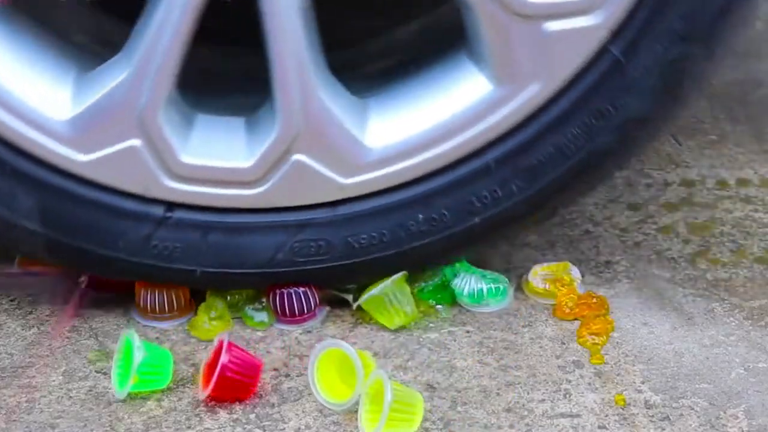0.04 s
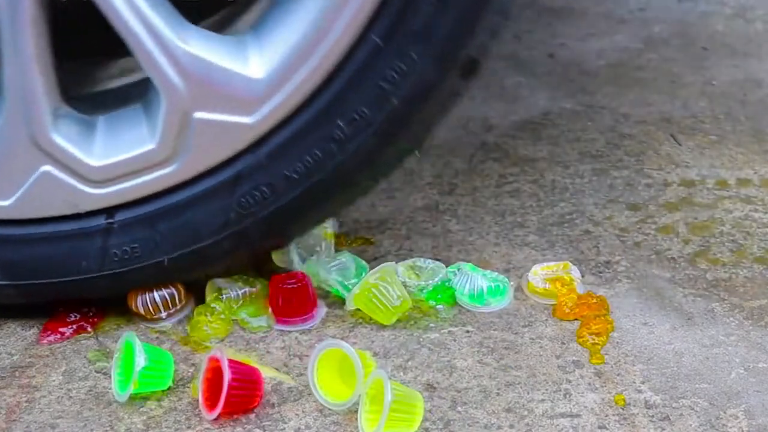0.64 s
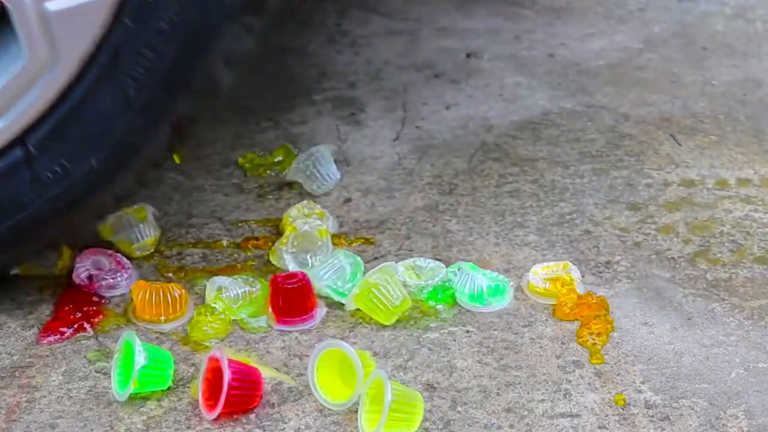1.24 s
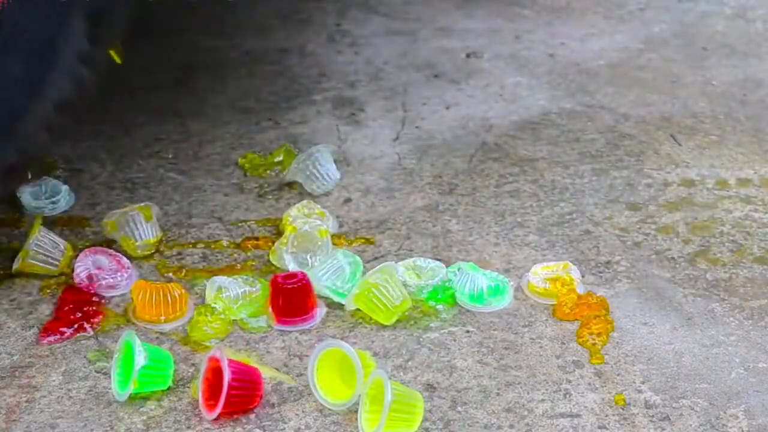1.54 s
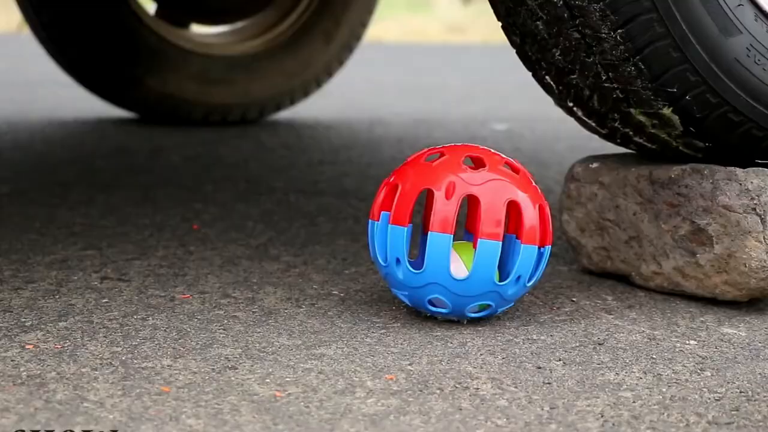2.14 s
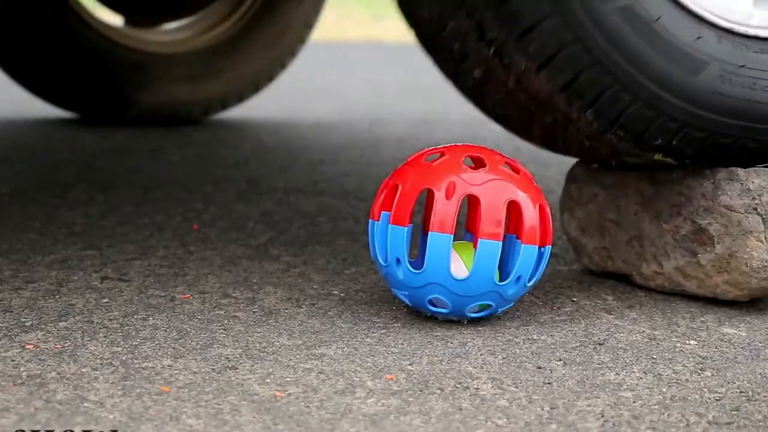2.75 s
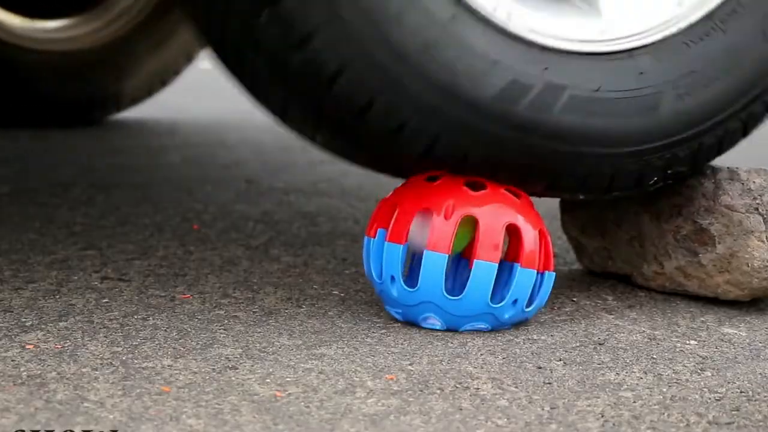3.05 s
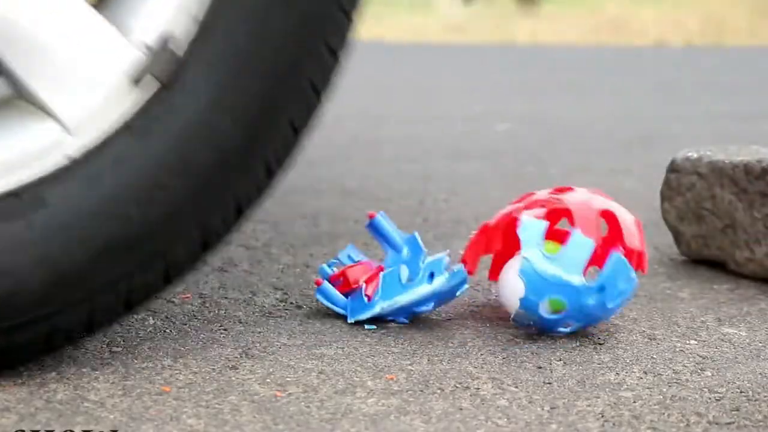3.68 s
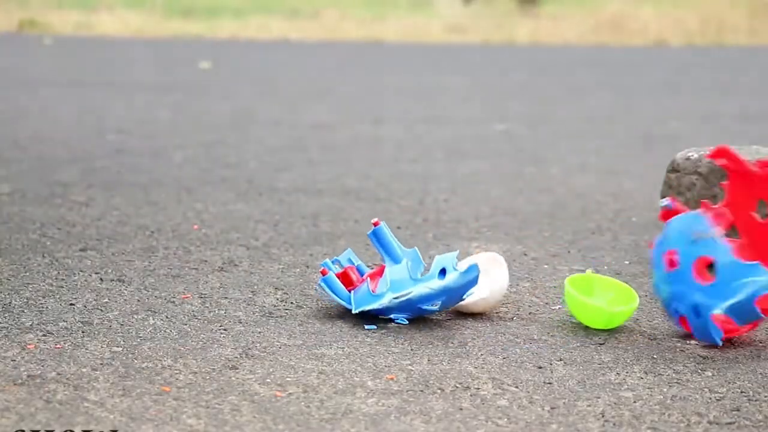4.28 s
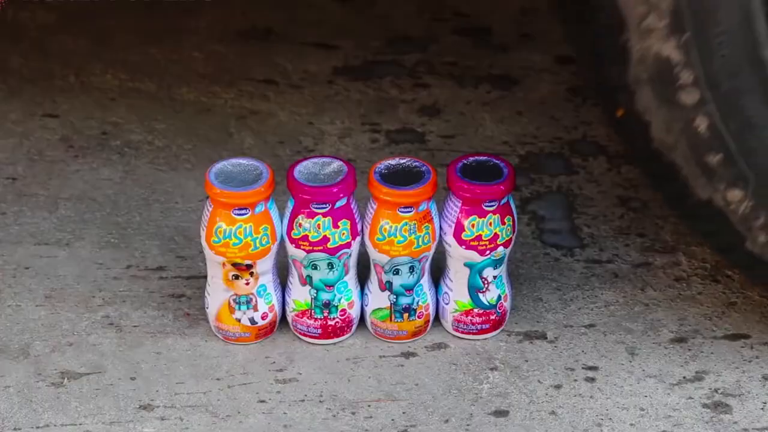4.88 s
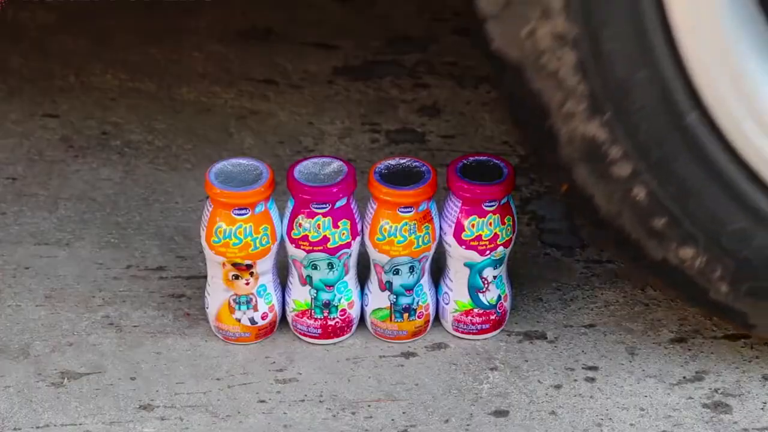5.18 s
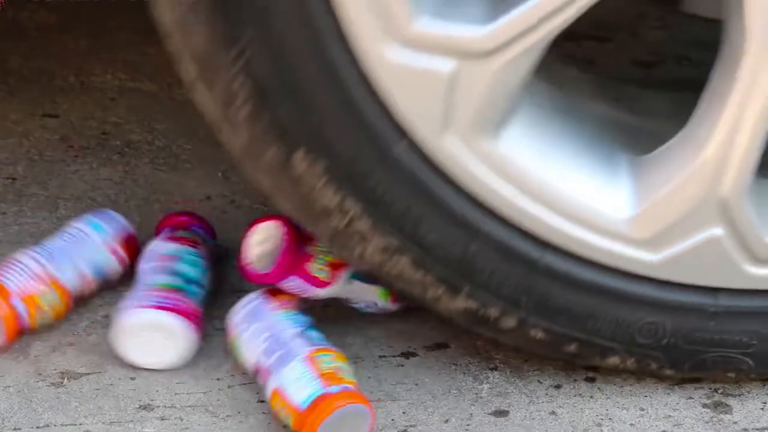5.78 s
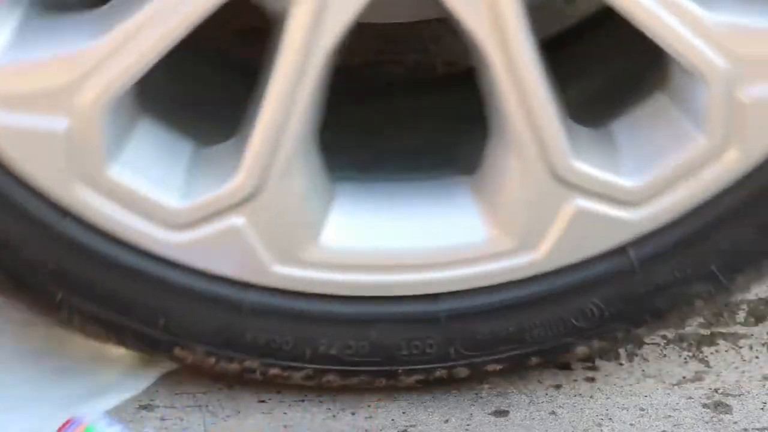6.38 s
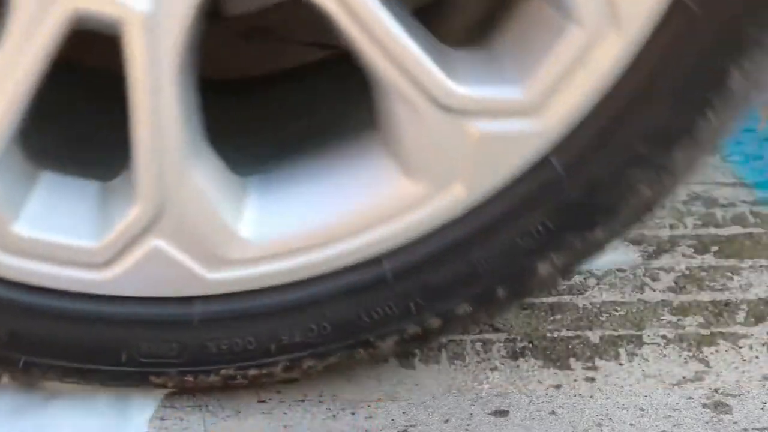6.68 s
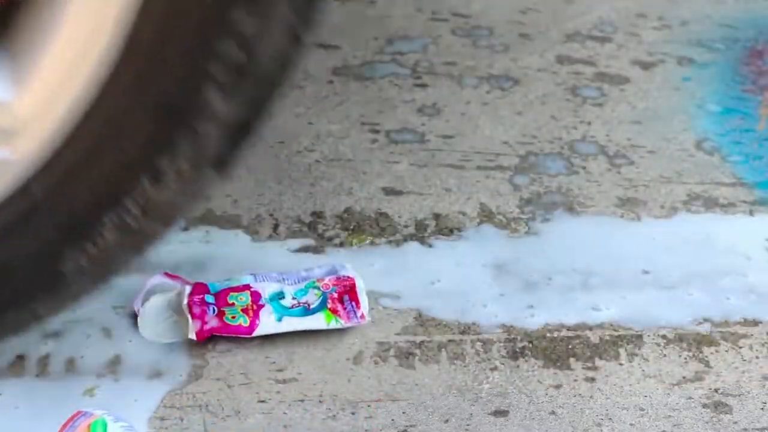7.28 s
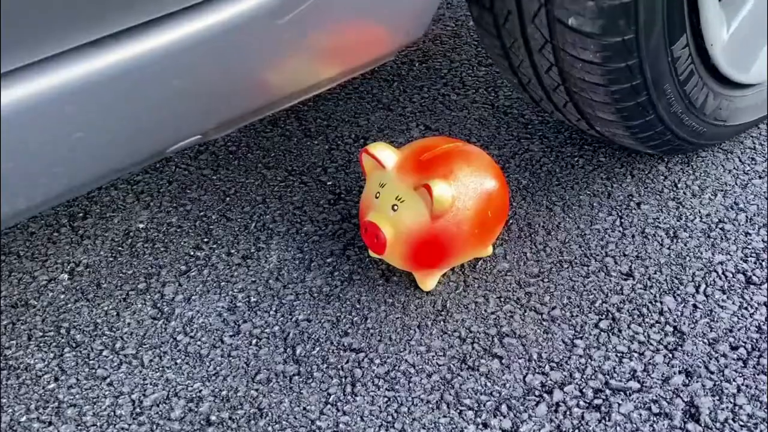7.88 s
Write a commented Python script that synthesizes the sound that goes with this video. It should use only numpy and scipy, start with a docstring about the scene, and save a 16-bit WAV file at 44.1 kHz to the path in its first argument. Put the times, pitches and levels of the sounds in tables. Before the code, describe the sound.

A car tyre crushes jelly cups close to the microphone, with crackling plastic, sharp pops and wet squirts in the first half second. Smaller snaps and light taps of falling cups follow until about 1.3 seconds, over a quiet idling engine. From 2.1 seconds the sound is further off and in stereo: a second car revs gently, its rubber scuffing on stone. From 3.1 to 3.5 a hollow plastic ball shatters in several loud cracks with low thumps, and pieces tick and scrape away over the paving until 4.7. At 4.8 the close mono idle returns, louder. Around 5.7 small drink bottles topple with hollow knocks and burst in loud pops, the strongest near 6.2. Dense crackling and snapping continue, with liquid spurting and sputtering from 6.6 to 7.2. A few last crackles follow, and at 7.8 a gust briefly rumbles on the microphone.

```python
"""A paved yard, where a car tyre rolls slowly over things in three scenes, the engine idling behind it.
Close to the microphone, in mono, jelly cups buckle, pop their lids and squirt. Further off, in stereo,
a second car climbs a stone and shatters a hollow plastic ball, whose pieces rattle away. Close again,
small drink bottles topple, burst, crackle under the tread and spit out their contents.
A gust catches the microphone at the very end."""
import sys
import numpy as np
from scipy import signal
from scipy.fft import rfft, irfft, next_fast_len
from scipy.io import wavfile

SR = 44100
rng = np.random.default_rng(int(sys.argv[2]) if len(sys.argv) > 2 else 0)


def materialize(psi):
    """Save the field psi as 16-bit PCM at rate SR to the path in sys.argv[1].

    A 1-D psi becomes a single channel; in a 2-D psi each row is a channel.
    """
    bounded = np.clip(np.atleast_2d(psi).T, -1, 1)
    quanta = np.round(bounded * 32767).astype(np.int16)
    wavfile.write(sys.argv[1], SR, quanta)


N = 349707
T = np.arange(N) / SR
FFT_SIZE = next_fast_len(N)
BIN_HZ = np.arange(FFT_SIZE // 2 + 1) * SR / FFT_SIZE


def from_db(db):
    """Decibels to gain."""
    return 10 ** (np.asarray(db) / 20)


def rms_one(x):
    """Scale to unit power."""
    return x / np.sqrt(np.mean(x ** 2) + 1e-20)


def bin_gains(spectrum):
    """Gain at each FFT bin, from points (freq_hz, level_db) joined on a log-frequency axis."""
    hz, db = np.transpose(spectrum)
    return from_db(np.interp(np.log(BIN_HZ + 1), np.log(hz), db))


def colour(x, spectrum):
    """Give a steady texture a spectrum that falls away beyond its ends; rms 1."""
    below = np.minimum(BIN_HZ / spectrum[0][0], 1) ** 3
    above = np.minimum(spectrum[-1][0] / (BIN_HZ + 1), 1) ** 3
    return rms_one(irfft(rfft(x, FFT_SIZE) * bin_gains(spectrum) * below * above, FFT_SIZE)[:N])


def noise(spectrum):
    """Coloured noise, rms 1."""
    return colour(rng.standard_normal(N), spectrum)


def band(x, low_hz, high_hz, order=2):
    """Causal band-pass."""
    high_hz = min(high_hz, .45 * SR)
    low_hz = min(low_hz, .9 * high_hz)
    return signal.sosfilt(signal.butter(order, [low_hz, high_hz], "band", fs=SR, output="sos"), x)


def band_noise(low_hz, high_hz, size):
    """Noise between two edges, rms 1."""
    return rms_one(band(rng.standard_normal(size), low_hz, high_hz))


def friction(hz, width_hz, size=N):
    """Friction noise through one resonance, rms 1."""
    return band_noise(hz - width_hz / 2, hz + width_hz / 2, size)


def waver(per_s):
    """Slow random wander, spread about 1."""
    return np.interp(T * per_s, np.arange(1000), rng.standard_normal(1000))


def tones(lines, wander):
    """Engine lines (pitch_hz, rms_db), each wandering a little in phase."""
    return sum(np.sqrt(2) * from_db(db) * np.sin(2 * np.pi * (hz * T + rng.random()) + wander * waver(8.6))
               for hz, db in lines)


def grains(per_s, spread_db, size=N):
    """Random clicks of either sign, most small and a few large."""
    heights = from_db(spread_db * np.minimum(rng.exponential(1, size), 4)) * rng.choice([-1, 1], size)
    return heights * (rng.random(size) < per_s / SR)


def decay(t, t60_s):
    """A fall of 60 dB every t60_s."""
    return from_db(-60 * t / t60_s)


def burst(t, length_s, rise_s, t60_s):
    """Rise, hold, then a dying tail."""
    return np.clip(t / rise_s, 0, 1) * decay(np.maximum(t - length_s, 0), t60_s)


def add(track, start_s, sound):
    """Mix a sound in at a time."""
    i = max(round(start_s * SR), 0)
    track[i:i + len(sound)] += sound[:max(N - i, 0)]


def ring(clicks, hz, t60_s):
    """A unit click sets a sine of height 1 ringing."""
    r, w = decay(1 / SR, t60_s), 2 * np.pi * hz / SR
    return signal.lfilter([0, np.sin(w)], [1, -2 * r * np.cos(w), r * r], clicks + 1e-18)


def struck(blows, modes):
    """Blows (start_s, level_db) on a body with modes (pitch_hz, level_db, t60_s)."""
    clicks = np.zeros(N)
    for start_s, db in blows:
        add(clicks, start_s, from_db([db]))
    return sum(from_db(db) * ring(clicks, hz, t60_s) for hz, db, t60_s in modes)


def knocked(blows, modes):
    """Blows (start_s, level_db, pitch_ratio) on like bodies of slightly different sizes."""
    return sum(struck([(start_s, blow_db)], [(hz * ratio, db, t60_s) for hz, db, t60_s in modes])
               for start_s, blow_db, ratio in blows)


def scatter(x, t60_s, low_hz, high_hz):
    """A diffuse dying tail: many close reflections or modes."""
    t = T[:int(t60_s * SR) + 2]
    tail = band(rng.standard_normal(len(t)), low_hz, high_hz, order=1) * burst(t, 0, .0036, t60_s)
    return signal.oaconvolve(x, tail / np.linalg.norm(tail))[:len(x)]


# Stereo width at the microphone: freq_hz, side_gain_db
WIDTH = [(60, -7), (110, -6), (200, -12), (380, -8.5), (700, -5), (1290, -5.5), (2380, -2.5), (4400, -4.5),
         (8120, 1), (15000, -1.5)]
def stereo(source):
    """Two draws of a source as mid and side; the microphone's two ports differ most in the treble."""
    mid, side = source(), source()
    side = irfft(rfft(side, FFT_SIZE) * bin_gains(WIDTH), FFT_SIZE)[:N]
    return np.array([mid + side, mid - side])


# Hum of the near engine: pitch_hz, relative_db
ENGINE_HUM = [(80.7, -38.5), (102.3, -46.5), (118.4, -41.5), (199.2, -58), (220.7, -50), (419.9, -55.5),
              (581.4, -55)]
# Its fan and belt whirr: freq_hz, density_db
FAN_WHIRR = [(76, -34.5), (130, -8), (224, -1.5), (268, -11.5), (410, -7.5), (994, -14), (1340, -11.5),
             (2050, -17.5), (3830, -21), (13600, -32), (16000, -41)]
# Its belt and pulley whines: pitch_hz, width_hz, relative_db
BELT_WHINES = [(600, 35, -17.5), (1395, 79, -12.5), (3900, 250, -19.5), (5570, 170, -20)]
# Its level at the microphone, held until the next step: start_s, hum_db, whirr_db
IDLE_STEPS = [(0, -45, -48.5), (4.8, -38.5, -37.5), (6.24, -61, -56), (6.36, -45, -52.5),
              (6.929, -58, -57.5)]
def idling_car(tick_hz=19.9, tick_depth=.19, shudder_db=-12):
    """Low engine lines and shudder under a whirr that swells briefly with each valve tick."""
    start_s, hum_db, whirr_db = np.transpose(IDLE_STEPS)
    step = np.searchsorted(start_s[1:], T)
    ticks = 1 + tick_depth * np.cos(np.pi * tick_hz * T) ** 16
    hum = rms_one(tones(ENGINE_HUM, wander=.25))
    hum += from_db(shudder_db) * noise([(24, 2.5), (65, 1), (160, -8)])
    whirr = noise(FAN_WHIRR) + sum(from_db(db) * friction(hz, width) for hz, width, db in BELT_WHINES)
    return from_db(hum_db)[step] * hum + from_db(whirr_db)[step] * rms_one(whirr) * ticks


# The tread bearing down on one thing after another, close up:
# start_s, length_s, release_t60_s, crackle_db, hiss_db, rumble_db, cracks_per_s
CRUSH_LOADS = [(-.02, .27, 0.34, -44, -41, -32.5, 3200), (0.279, .19, 0.31, -44, -39.5, -33.5, 3500),
               (1.09, .16, 0.44, -55, -73, -72, 190), (5.712, 0.27, 0.22, -45, -71, -37, 500),
               (5.948, .275, .08, -36, -46, -32, 570), (6.353, .15, .16, -30.5, -41.5, -39, 600),
               (6.536, .09, .1, -35, -47, -48, 300), (6.633, .27, .1, -25, -34, -38.5, 1700),
               (6.917, .13, .1, -23.5, -35.5, -51, 3000), (7.3, .36, 0.37, -47.5, -68, -70, 320)]
# Crackle and wet hiss under the tread: freq_hz, density_db
TREAD_CRACKLE = [(290, -43.5), (500, -7.5), (538, -14.5), (761, 0.5), (855, -4), (2330, -2), (4940, -0.5),
                 (9090, -5), (12500, -3), (16000, -13)]
# Rumble of the loaded tyre: freq_hz, density_db
TYRE_RUMBLE = [(40, -6.5), (110, 2), (200, 2), (330, -4.5), (700, -7.5), (1500, -20), (3000, -44.5)]
def tread(grit_db=-62.5, grit_per_s=100, ring_cycles=12, rasp_db=-13, clump_db=4):
    """Under each crush, grit and creased plastic crackle in clumps, juice hisses, the tyre rumbles."""
    loads = np.array([burst(T - start_s, length_s, rise_s=.018, t60_s=t60_s)
                      for start_s, length_s, t60_s, *_ in CRUSH_LOADS])
    *_, crackle_db, hiss_db, rumble_db, cracks_per_s = np.transpose(CRUSH_LOADS)
    crackle_gain, hiss_gain, rumble_gain = (np.sqrt(from_db(db) ** 2 @ loads ** 2)
                                            for db in (crackle_db, hiss_db, rumble_db))
    per_s = grit_per_s + cracks_per_s @ loads
    cracks = grains(per_s, spread_db=5) / np.sqrt(per_s)
    pitches_hz = np.geomspace(900, 14500, num=18)
    pitch_index = rng.integers(0, len(pitches_hz), N)
    rings = sum(hz * ring(cracks * (pitch_index == k), hz, ring_cycles / hz)
                for k, hz in enumerate(pitches_hz))
    rasp = from_db(rasp_db) * rng.standard_normal(N)
    crackle = colour(rms_one(rings) + rasp, TREAD_CRACKLE) * from_db(clump_db * waver(90))
    crackle *= np.hypot(crackle_gain, from_db(grit_db))   # loose grit goes on between crushes
    return crackle + hiss_gain * noise(TREAD_CRACKLE) + rumble_gain * noise(TYRE_RUMBLE)


# Thin cup and bottle walls buckling, close up: start_s, peak_db, pitch_hz
BUCKLES = [(0.0638, -4, 4350), (0.0965, 6, 4940), (.176, -0.5, 3640), (0.2484, -12.5, 3000),
           (0.302, 7, 8900), (0.5966, -3.5, 6000), (0.6165, -13.5, 2350), (0.8563, -21, 3270),
           (1.9832, -18.5, 6230), (6.0488, -2.5, 9400), (6.0852, 1, 12300), (6.1126, 0.5, 4750),
           (6.1491, 7, 13700), (6.188, 2, 12200), (6.308, -0.5, 3880), (6.314, -6, 3970),
           (6.3237, -7, 5930), (6.3366, -3.5, 11800), (6.3704, -1, 8600), (6.3865, -8, 3300),
           (6.4176, 3.5, 8300), (6.4347, -3, 8500), (6.479, 5, 11500), (6.494, -3, 6000),
           (6.5018, 5.5, 7750), (6.5278, 3.5, 12600), (6.5514, -13.5, 2360), (6.5828, 1.5, 3670),
           (6.6162, 3, 5200), (6.7177, -5, 5200), (6.7723, 2, 11500), (6.8384, 6.5, 5630),
           (6.8535, -6, 3900), (6.8829, -4.5, 2800), (6.992, -2, 5070), (7.4441, -18, 5600),
           (7.546, 0, 12900), (7.729, -19, 10500)]
def snaps(ring_cycles=8, slip_size=.13, creep_db=-12, creep_s=.0012, clicky_hz=7480, lead_s=.0002):
    """A wall creeps, buckles with one sharp click and slips a few more times; its panel rings briefly."""
    out, onset = np.zeros(N), SR // 200
    t = T[:SR // 30] - onset / SR
    creep = from_db(creep_db) * np.exp(-np.abs(t) / creep_s)
    strain = np.where(t < 0, creep, decay(np.abs(t), t60_s=.013))
    for start_s, db, hz in BUCKLES:
        slips = slip_size * grains(per_s=2500, spread_db=3.3, size=len(t)) * strain
        slips[onset] = 1
        panel = ring(slips, hz, ring_cycles / hz)
        click = band(slips, hz / 5, 2.1 * hz + 3000, order=1)
        snap = rms_one(panel) + hz / clicky_hz * rms_one(click)   # small, high panels mostly click
        add(out, start_s - lead_s + t[0], from_db(db) * snap / np.abs(snap).max())
    return out


# Seals bursting, close up: start_s, puff_db, cavity_hz, tear_db, tyre_ring_db
SEAL_BURSTS = [(0.0963, -13.5, 513, -16, -16.5), (0.1759, 3, 724, -14, -17.5),
               (0.2882, -10.5, 596, -20.5, -37), (.312, 1.5, 770, -24, -6.5),
               (0.3881, -2.5, 1130, -37, -43), (.6166, -17, 755, -30, -61), (5.6976, 9, 736, -15.5, -34),
               (5.7228, 4, 408, -7.5, -18.5), (5.7916, 8, 242, -10.5, -26), (5.9785, 10, 760, -12, -38),
               (6.0281, -2.5, 1500, -14, -27.5), (6.2238, 13, 533, 1, -39.5),
               (6.3083, -7.5, 1260, -11.5, -41), (7.0577, -9, 380, -13.5, -41),
               (7.1656, -9, 1500, -15.5, -53)]
# Air ringing inside the tyre: pitch_hz, level_db, t60_s
TYRE_AIR_MODES = [(206, -14, .12), (298, -1.5, 0.1), (430, -14, 0.046), (544, -9, .05)]
def pops(bulge_db=-20, bulge_s=.0041, tear_lead_s=.001967, sag=.31, sag_s=.005, flutter=.6,
         push=.24, push_hz=170, gulp_db=-9.5, gulp_ratio=.35, gulp_lag_s=.0025):
    """A lid bulges and tears, trapped air puffs out, a weaker, lower gulp follows and the tyre rings."""
    out, t = np.zeros(N), T[:SR // 15]
    for start_s, puff_db, cavity_hz, tear_db, _ in SEAL_BURSTS:
        bulge = band_noise(300, 1800, len(t)) * np.exp((t - t[-1]) / bulge_s)
        rips = grains(per_s=12000, spread_db=2.2, size=len(t))
        tear = rms_one(band(rips, 440, 6600, order=1)) * burst(t, .0022, rise_s=.0012, t60_s=.017)
        pitch_hz = cavity_hz * (1 - sag + sag * np.exp(-t / sag_s))   # sags as the jet widens
        pitch_hz *= 1 + flutter * band_noise(300, 1500, len(t))
        phase = 2 * np.pi * np.cumsum(pitch_hz) / SR
        puff = (np.sin(phase) + push * np.sin(2 * np.pi * push_hz * t)) * decay(t, t60_s=.0095)
        gulp = np.sin(gulp_ratio * phase) * decay(t, t60_s=.013)
        add(out, start_s - t[-1], from_db(bulge_db + puff_db / 2) * bulge)
        add(out, start_s - tear_lead_s, from_db(tear_db) * tear)
        add(out, start_s, from_db(puff_db) * puff)
        add(out, start_s + gulp_lag_s, from_db(puff_db + gulp_db) * gulp)
    return out + struck([(start_s, ring_db) for start_s, *_, ring_db in SEAL_BURSTS], TYRE_AIR_MODES)


# Juice and air forced through a split, close up: start_s, level_db, rise_s, t60_s, low_hz, high_hz
JETS = [(.098, -32, .002, 0.23, 3500, 8030), (.39, -23.5, .004, 0.034, 9000, 14300),
        (0.872, -25, .004, 0.034, 2090, 3900), (1.102, -32, .006, 0.063, 1500, 3200),
        (6.653, -13.5, 0.0049, 0.087, 990, 6550), (6.904, -6.5, 0.0011, 0.19, 4300, 11760),
        (7.058, -8, 0.0011, 0.039, 323, 900), (7.076, -7.5, 0.0015, 0.047, 555, 1740),
        (7.102, -13.5, 0.0018, 0.04, 704, 5000), (7.115, -10, .002, .04, 786, 2070),
        (7.192, -16, 0.0071, .06, 780, 2840), (7.54, -33.5, 0.0018, 0.23, 1500, 7000),
        (7.603, -21, 0.003, 0.022, 800, 2810)]
def squirts(full_pressure_s=.011, spray_db=-8, flap_db=3.5):
    """A flapping split spurts, then sputters out: dense tiny bursts in its band, with a fine spray."""
    out, t = np.zeros(N), T[:SR // 4]
    for start_s, db, rise_s, t60_s, low_hz, high_hz in JETS:
        sputter = grains(per_s=5000, spread_db=2, size=len(t))
        sputter *= from_db(flap_db * band_noise(80, 450, len(t)))
        spray = band(sputter, 1000 + low_hz / 2, 7000 + high_hz / 2, order=1)
        jet = rms_one(band(sputter, low_hz, high_hz)) + from_db(spray_db) * rms_one(spray)
        add(out, start_s, from_db(db) * jet * burst(t, full_pressure_s, rise_s, t60_s))
    return out


# Cups landing on the paving, close up: start_s, level_db, pitch_ratio
CUP_DROPS = [(.6625, -30, 1.1), (1.0563, -23, 0.88), (1.1567, -27, .9), (1.1924, -24.5, 0.87),
             (1.2539, -21, 1.28), (1.3077, -28, 0.78)]
# An empty cup's ring: pitch_hz, level_db, t60_s
CUP_MODES = [(1080, -3, 0.0095), (2500, -0.5, 0.0032), (6000, -4.5, 0.0013)]
def cups():
    """Emptied cups drop to the ground with light, dry taps."""
    return knocked(CUP_DROPS, CUP_MODES)


# Open air across the yard: freq_hz, density_db
YARD_AIR = [(15, -28.5), (25, -7.5), (80, -11.5), (197, -26), (326, -26.5), (632, -32.5), (684, -30),
            (1730, -39.5), (3440, -42.5), (3730, -48), (14000, -53.5)]
def open_air(level_db=-51):
    """A steady low rush of air round the second car."""
    return from_db(level_db) * stereo(lambda: noise(YARD_AIR))


# The second car's throttle, pushed for the climb: start_s, hold_s, depth_fraction
PEDAL_PUSHES = [(2.25, .34, 0.99), (3.201, .12, .8)]
# Its exhaust harmonics: firing_multiple, relative_db
EXHAUST_ORDERS = [(1, 3), (2, 0), (3, -7), (4, -15)]
# Its idle hum, further from the microphone: pitch_hz, relative_db
DISTANT_HUM = [(75.4, -55), (199.2, -65)]
def climbing_car(idle_hz=55.8, rev_hz=38, flywheel_lag_s=.14, press_s=.22, release_s=.36,
                 exhaust_db=-57.5, throttle_db=23, roughness=.57, hum_db=-2):
    """The engine gets louder with the throttle and speeds up after it, held back by the flywheel."""
    throttle = np.zeros(N)
    for start_s, hold_s, depth in PEDAL_PUSHES:
        pressed = np.clip((T - start_s) / press_s, 0, 1)
        released = np.clip((T - start_s - press_s - hold_s) / release_s, 0, 1)
        throttle += depth * (pressed - released)
    inertia = np.exp(-1 / (flywheel_lag_s * SR))
    firing_hz = idle_hz + rev_hz * signal.lfilter([1 - inertia], [1, -inertia], throttle) ** 2
    phase = 2 * np.pi * np.cumsum(firing_hz) / SR
    exhaust = sum(from_db(db) * (1 + roughness * waver(45)) * np.sin(k * phase + 2 * roughness * waver(35))
                  for k, db in EXHAUST_ORDERS)
    hum = from_db(hum_db) * tones(DISTANT_HUM, wander=.5)
    return from_db(exhaust_db + throttle_db * throttle) * rms_one(exhaust) + hum


# Rubber juddering and chirping, shell pieces scraping, further off:
# start_s, length_s, level_db, pitch_hz, width_hz
SLIDES = [(2.244, 0.028, -34, 155, 70), (2.332, 0.016, -44, 9400, 400), (2.464, 0.018, -44.5, 8700, 600),
          (2.677, 0.13, -59, 2950, 500), (3.329, 0.044, -24.5, 1320, 300), (3.398, 0.005, -16, 1325, 120),
          (3.565, 0.014, -38.5, 3500, 5000), (3.622, 0.027, -30.5, 2900, 3740),
          (3.811, 0.042, -44.5, 3200, 1330), (3.878, 0.0085, -39.5, 2900, 493),
          (3.924, 0.015, -47, 2510, 900)]
def rubs(rise_s=.005, t60_s=.092):
    """Short stick-slip slides, each exciting one resonance."""
    out, t = np.zeros(N), T[:SR // 5]
    for start_s, length_s, db, hz, width_hz in SLIDES:
        add(out, start_s, from_db(db) * friction(hz, width_hz, len(t)) * burst(t, length_s, rise_s, t60_s))
    return out


# Rubber scuffing on the stone, further off: freq_hz, density_db
STONE_SCUFF = [(180, -26), (300, -1), (692, -18), (1340, -17), (2900, -22.5), (4770, -27), (9670, -30),
               (14000, -45.5)]
def tyre_on_stone(whistle_s=2.33, whistle_db=-50, flutter_db=2, scuff_s=2.255, scuff_db=-47):
    """Rubber straining on the stone swells, holds and dies away, first as a whistle, then as a scuff."""
    whistle_gain = from_db(whistle_db) * burst(T - whistle_s, length_s=.28, rise_s=.13, t60_s=.48)
    whistle_gain *= from_db(flutter_db * waver(60))
    whistle = stereo(lambda: friction(hz=10000, width_hz=400))
    scuff_gain = from_db(scuff_db) * burst(T - scuff_s, length_s=.62, rise_s=.37, t60_s=2)
    return whistle_gain * whistle + scuff_gain * stereo(lambda: noise(STONE_SCUFF))


# Ticks of the ball's shell, further off: start_s, level_db, pitch_ratio
SHELL_TAPS = [(3.0997, -25, 1.1), (3.2079, -9.5, .9), (3.7032, -22, 0.96), (3.7598, -36, 1.1),
              (3.819, -19.5, 1.02), (3.9314, -28, 0.82), (4.0355, -41, 1.14), (4.1249, -41.5, 0.92),
              (4.185, -36.5, 1.05), (4.2622, -41, 1.36), (4.632, -46, .97), (4.7033, -36.5, 1.01)]
# One piece of shell: pitch_hz, level_db, t60_s
PIECE_MODES = [(3300, -9.5, 0.008), (6700, 1, 0.0018), (10500, -5, 0.00079)]
def shell_ticks(ring_db=-1):
    """The hard shell ticks as it strains, then as its pieces tumble, each with a diffuse ring."""
    ticks = knocked(SHELL_TAPS, PIECE_MODES)
    ringing = np.array([scatter(ticks, t60_s=.094, low_hz=1500, high_hz=9000) for _ in range(2)])
    return ticks + from_db(ring_db) * ringing


# The ball giving way, further off: start_s, length_s, level_db
BALL_FRACTURES = [(3.1549, 0.019, -13.5), (3.238, 0.024, -12.5), (3.265, 0.055, -14), (3.332, 0.066, -16),
                  (3.4502, 0.012, -13), (3.477, 0.022, -14), (3.535, 0.0077, -20)]
# Its cracking shell: freq_hz, density_db
SHELL_CRACK = [(410, -44), (700, -12), (1330, -11), (1500, -10.5), (1750, -3.5), (2430, -7.5), (2660, -3),
               (4550, -9), (7110, -6.5), (9730, -11), (13900, -17), (14600, -33), (16000, -64.5)]
# Its hollow body: freq_hz, density_db
BALL_BOOM = [(25, -11), (70, -3.5), (150, 0.5), (320, 1.5), (600, -9.5), (900, -5), (1300, -1),
             (1700, -18.5), (3000, -33.5)]
def shatter(rise_s=.00065, boom_db=-5.5, surge_db=2, shard_sets=4, shard_turn_s=.03):
    """Cracks race through the shell in surges, ringing sets of shards in turn; the hollow body booms."""
    crack_power, boom_power, t = np.zeros(N), np.zeros(N), T[:SR // 2]
    for start_s, length_s, db in BALL_FRACTURES:
        add(crack_power, start_s, (from_db(db) * burst(t, length_s, rise_s, t60_s=.1)) ** 2)
        add(boom_power, start_s, (from_db(db + boom_db) * burst(t, length_s, rise_s, t60_s=.082)) ** 2)
    surge = from_db(surge_db * waver(140))
    active_set = (T // shard_turn_s) % shard_sets

    def cracking():
        cracks = grains(per_s=4000, spread_db=3) * surge
        shards = sum(scatter(cracks * (active_set == k), t60_s=.021, low_hz=300, high_hz=16000)
                     for k in range(shard_sets))
        return colour(cracks + shards, SHELL_CRACK)

    return np.sqrt(crack_power) * stereo(cracking) + np.sqrt(boom_power) * stereo(lambda: noise(BALL_BOOM))


# The tyre meeting the paving, further off: start_s, level_db
TYRE_DROPS = [(3.25, -30), (3.488, -25.5)]
# Its carcass: pitch_hz, level_db, t60_s
CARCASS_MODES = [(70, -1.5, 0.54), (199, -5.5, 1), (232, -17, 0.75)]
def tyre_landings():
    """The tyre drops off the ball and its carcass rings low."""
    return struck(TYRE_DROPS, CARCASS_MODES)


def splinters(start_s=3.55, level_db=-40):
    """Small splinters patter away over the paving and come to rest."""
    def patter():
        hits = grains(per_s=500, spread_db=3)
        return colour(scatter(hits, t60_s=.012, low_hz=900, high_hz=9000), SHELL_CRACK)

    return from_db(level_db) * burst(T - start_s, length_s=0, rise_s=.002, t60_s=1) * stereo(patter)


# Full bottles hitting the paving, close up: start_s, level_db, pitch_ratio
BOTTLE_KNOCKS = [(5.731, -23, 0.92), (5.778, -21, 0.99), (5.806, -18, 1), (5.8435, -8.5, 1.0),
                 (5.881, -21.5, 1.16)]
# A full bottle's ring: pitch_hz, level_db, t60_s
BOTTLE_MODES = [(626, 2.5, 0.069), (674, -20, .04), (757, -20, 0.065)]
def bottles():
    """Each toppling bottle gives a hollow knock at its own pitch."""
    return knocked(BOTTLE_KNOCKS, BOTTLE_MODES)


# Wind right on the microphone: freq_hz, density_db
MIC_WIND = [(12, -29), (20, 9), (82, -7), (263, -23.5), (319, -32), (933, -24), (3630, -58.5), (6000, -65),
            (7800, -89.5), (13200, -120)]
def gust(start_s=7.815, level_db=-27.5, rise_s=.0056):
    """A sudden gust buffets the microphone with a low rumble."""
    return from_db(level_db) * np.clip((T - start_s) / rise_s, 0, 1) * noise(MIC_WIND)


def scene(ball_from_s=2.1, ball_to_s=4.806, bass_hz=85, far_top_hz=14300,
          wheel_echo_db=-12, underbody_echo_db=-23, yard_echo_db=-21):
    """Cups and bottles are heard close and in mono; between them, the ball further off and in stereo."""
    crushing = snaps() + squirts() + tread() + cups()
    crushing += from_db(wheel_echo_db) * scatter(crushing, t60_s=.0045, low_hz=1220, high_hz=14000)
    low_cut = signal.butter(3, bass_hz, "high", fs=SR, output="sos")   # small things radiate little bass
    close = signal.sosfilt(low_cut, crushing + pops() + bottles())
    close += from_db(underbody_echo_db) * scatter(close, t60_s=.066, low_hz=250, high_hz=7000)

    ball = shatter() + splinters() + stereo(rubs) + shell_ticks()
    yard_echo = np.array([scatter(channel, t60_s=.88, low_hz=300, high_hz=5000) for channel in ball])
    far = ball + from_db(yard_echo_db) * yard_echo + climbing_car() + tyre_on_stone() + open_air()
    far = signal.sosfilt(signal.cheby1(10, .5, far_top_hz, fs=SR, output="sos"), far)

    at_ball = (T > ball_from_s) & (T < ball_to_s)
    return np.where(at_ball, far + tyre_landings(), close + idling_car()) + gust()


def record(dry):
    """The loudest pops overload; the top is cut above 16.2 kHz."""
    clipped = np.clip(dry, -1, 1)
    return signal.sosfiltfilt(signal.butter(14, 16200, fs=SR, output="sos"), clipped)


dry = scene()
out = record(dry)
materialize(out)
```